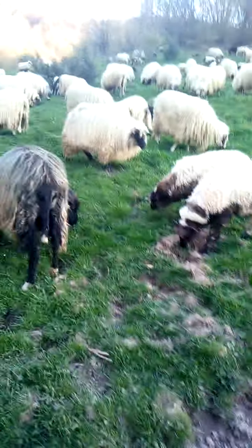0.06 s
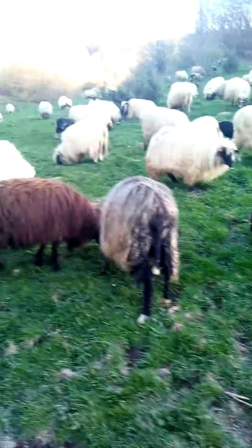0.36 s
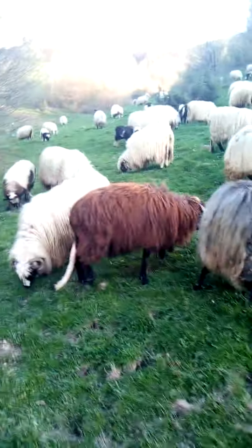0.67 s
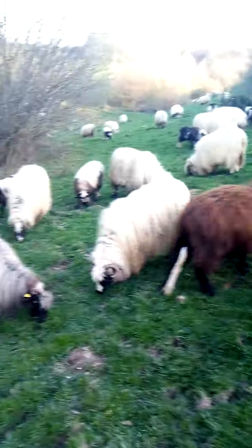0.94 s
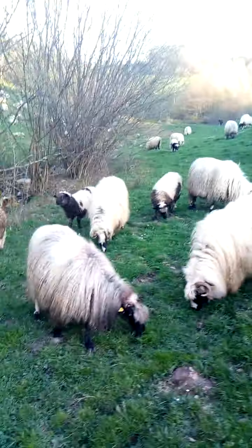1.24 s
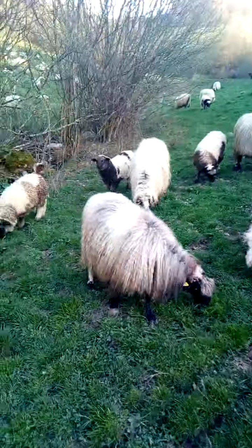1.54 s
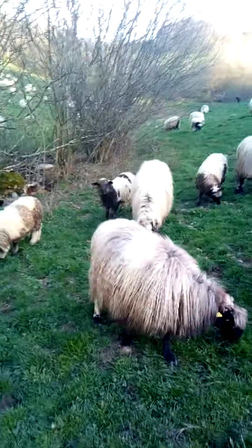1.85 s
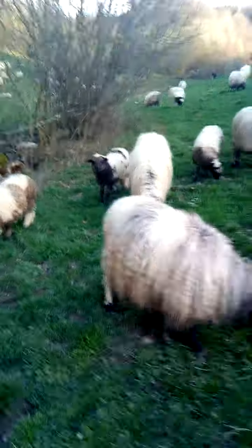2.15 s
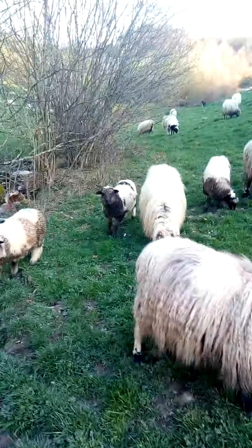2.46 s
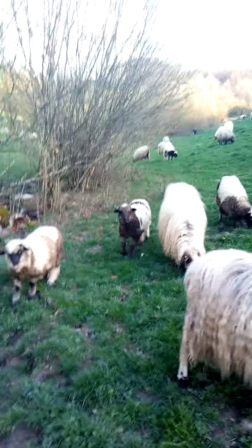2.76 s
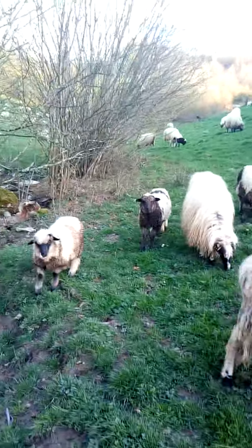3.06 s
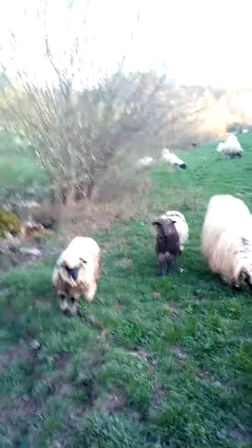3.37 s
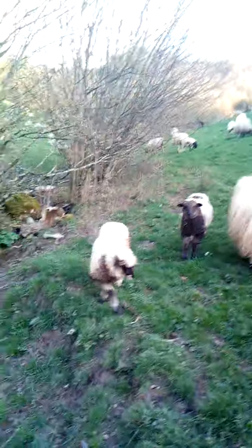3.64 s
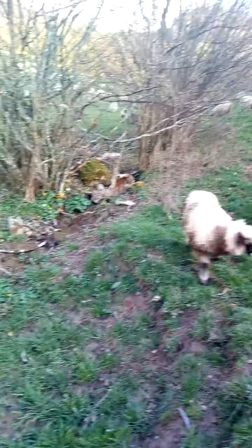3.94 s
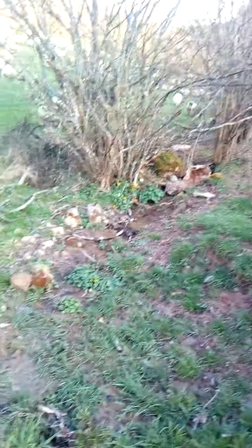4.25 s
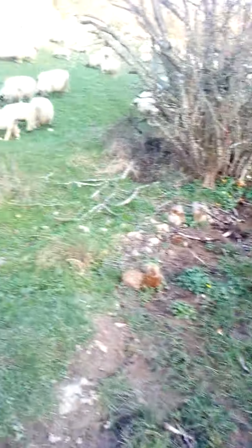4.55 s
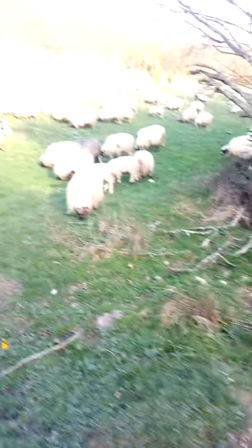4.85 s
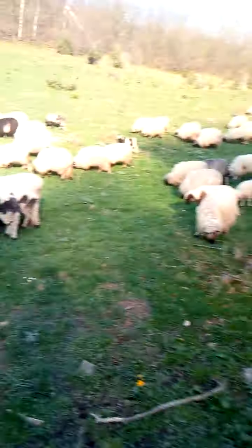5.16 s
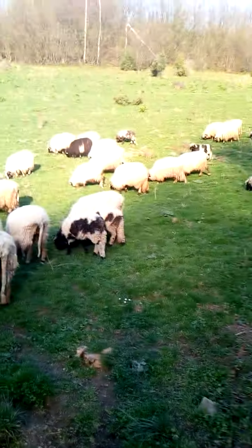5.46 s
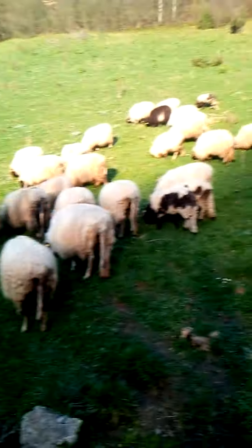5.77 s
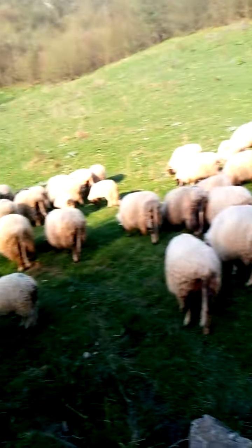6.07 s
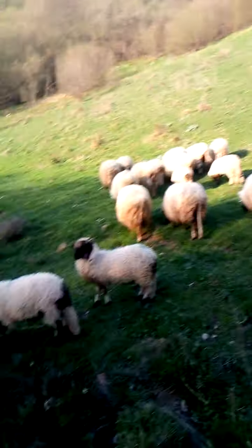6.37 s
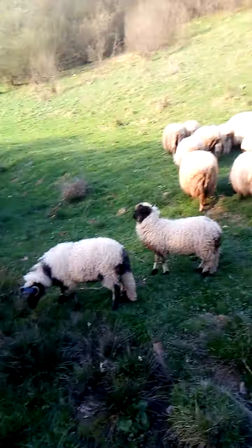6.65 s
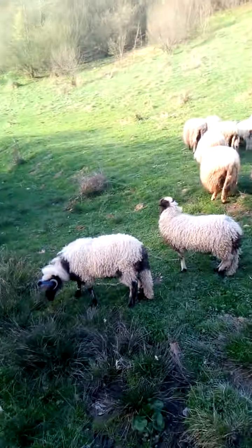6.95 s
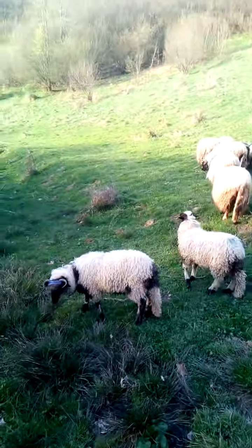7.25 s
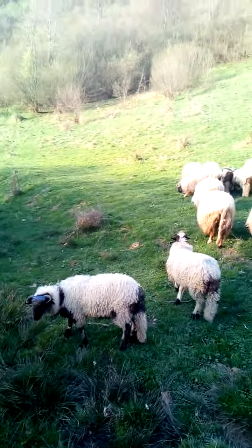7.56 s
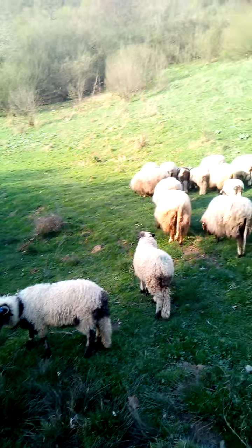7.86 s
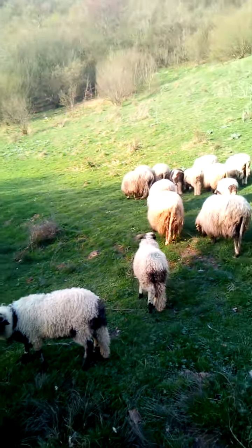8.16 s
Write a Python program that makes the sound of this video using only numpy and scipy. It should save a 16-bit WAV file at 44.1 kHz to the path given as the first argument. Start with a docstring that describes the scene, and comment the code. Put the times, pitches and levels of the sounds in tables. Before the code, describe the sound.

Hollow, uneven clanks of a sheep's bell, seven sharp smacking clicks close by, soft rustling and a far bleat near the end.

```python
"""Sheep bell on a hillside

Sheep graze in the open; one wears a sheet-metal bell that clanks as it tugs at the grass, each clapper
blow a hollow note under ringing wall modes. Someone among them turns in a jacket, cloth hissing on
cloth, and shifts on the turf with soft thuds and snapping stalks. Seven sharp smacks ring a small cavity
close by, like tongue clicks to coax a lamb. Near the end a sheep gives one quavering bleat far off."""
import sys
import numpy as np
from scipy import signal
from scipy.fft import rfft, irfft
from scipy.io import wavfile
from scipy.ndimage import uniform_filter1d

SR = 44100
rng = np.random.default_rng(int(sys.argv[2]) if len(sys.argv) > 2 else 0)


def store_wav(level_fs):
    """Save 16-bit WAV to argv[1]."""
    pcm = np.round(np.clip(np.atleast_2d(level_fs), -1, 1) * 32767)
    wavfile.write(sys.argv[1], SR, pcm.T.astype(np.int16))


N = 370881


def bell(hollow_hz=671, sway_hz=4.9, flutter_db=2.06, split_hz=14, rasp_db=-24, clank_t60=0.47):
    """Each clapper blow wakes the cup's quickly damped hollow note and the thinner modes of its wall."""
    # clapper blows: (time [s], hollow note [dB], its t60 [s], low hum [dB], high clang [dB],
    # humming mode [Hz], pinging mode [Hz], ping over the clang [dB])
    blows = [(0.073, -31.5, .13, -52.5, -52, 2045, 6212, 1),
             (0.2708, -27.5, .17, -62.5, -49.5, 2115, 5221, 7.5),
             (0.584, -32, .16, -53.5, -52.5, 2045, 3445, 7.5),
             (0.825, -25.5, 0.16, -58, -50, 2115, 5221, 18), (0.943, -29.5, .11, -58, -57, 2562, 5221, 7),
             (1.276, -29, .22, -57.5, -61.5, 2497, 5458, 2),
             (1.408, -20, .15, -48.5, -48.5, 2045, 4301, 7.5), (1.607, -29, .14, -49, -60.5, 2045, 6212, 2),
             (2.013, -26, .26, -56, -48, 2115, 6212, 2), (2.191, -25, .12, -56.5, -60.5, 2497, 6212, 7),
             (2.385, -36, 0.17, -60, -63, 2497, 6212, 8), (2.627, -31.5, .2, -70, -71, 1534, 3967, 2),
             (2.791, -32.5, 0.21, -68, -63, 1534, 6529, 4.5), (2.995, -28, .13, -51, -49, 2045, 4301, 0.5),
             (3.973, -28.5, .22, -57, -49.5, 1534, 6212, 6),
             (4.147, -31.5, .13, -57.5, -55.5, 2045, 4301, 9.5),
             (5.372, -33, .13, -65, -55.5, 2045, 4301, -1),
             (5.525, -36.5, .21, -60.5, -45, 2115, 4301, 4.5),
             (6.075, -47.5, .2, -56, -59.5, 2045, 6529, 4), (6.336, -34, .16, -59, -57.5, 1291, 5221, 10),
             (6.555, -51, .15, -57.5, -61.5, 2045, 6212, 5.5), (6.876, -37, .19, -58.5, -58, 1291, 5221, 2),
             (7.118, -37, .17, -57.5, -55, 2562, 3445, 2.5), (7.46, -37.5, .25, -50, -51, 1534, 3445, 0.5),
             (7.717, -36.5, 0.17, -54, -54.5, 1291, 3445, 6.5),
             (7.857, -32.5, .15, -54, -54, 1291, 3967, -11), (7.943, -28, .16, -45, -50, 1291, 6212, 2),
             (8.032, -27.5, .14, -48, -43, 2562, 5749, 0.5),
             (8.317, -41.5, 0.21, -66, -63, 2497, 4021, 6.5)]
    # modes of the sheet-metal wall: (frequency [Hz], relative level [dB], t60 [s])
    wall_modes = [(1076, -22, 0.3), (1291, -7.5, 0.34), (1534, -12, 0.7), (2045, -8, 0.55),
                  (2115, -15, 0.6), (2497, -12, 0.65), (2562, -17, 0.6), (3143, -16, 0.21),
                  (3445, -5, 0.26), (3892, -15, 0.3), (3967, -8, 0.35), (4021, -10, 0.2), (4301, -2, 0.16),
                  (4742, -14, 0.24), (4968, -18, 0.26), (5221, 0, 0.14), (5458, -7, 0.19),
                  (5620, -14, 0.19), (5749, -7, 0.17), (6212, -1, 0.13), (6443, -9, 0.2), (6529, -8, 0.27),
                  (6992, -16, 0.16), (7353, -12, 0.12), (7590, -18, 0.11), (8118, -21, 0.11),
                  (8828, -24, 0.16), (9598, -32, 0.17), (10039, -23, 0.09), (10755, -31, 0.12)]
    out, t = np.zeros(N), np.arange(int(.7 * SR)) / SR
    hz, db, t60 = np.transpose(wall_modes)
    register = np.searchsorted([2800, 6900], hz)  # low, high, top
    # the seam splits each mode into a beating pair
    beats = 1 + 0.15 * np.exp(2j * np.pi * split_hz * rng.standard_normal((len(hz), 1)) * t)
    rings = amp(-60 * t / t60[:, None]) * np.exp(2j * np.pi * hz[:, None] * t) * beats
    attack_s = np.where(register == 0, 0.0043, 0.0011)  # the low modes swell in last
    rings *= 1 - np.exp(-t / attack_s[:, None])
    for s, note_db, note_t60, hum_db, clang_db, hum_hz, ping_hz, ping_db in blows:
        rise_s = 0.0023 * amp(-0.37 * (note_db + 28.5))  # a gentle blow builds up more slowly
        # the swinging mouth bends and shakes the hollow note; a narrow band of noise roughens it
        turns = np.cumsum(hollow_hz + sway_hz * drift(len(t), 50)) / SR
        cup = np.sin(2 * np.pi * turns) + amp(rasp_db) * noise_band(len(t), 533, 866)
        decay = amp(note_db - 60 * t / note_t60 + flutter_db * drift(len(t), 90))
        note = cup * decay * (1 - np.exp(-t / rise_s)) ** 2
        top_db = clang_db + 2 + 0.24 * (clang_db + 56)  # a harder blow is brighter
        # the clapper never lands on the same spot, and each spot favours one low and one high mode
        spot_db = np.array([3, 3, 5])[register] * rng.standard_normal(len(hz))
        mode_db = db + np.array([hum_db - 1, clang_db, top_db])[register] + spot_db
        mode_db[abs(hz - hum_hz).argmin()] = hum_db
        mode_db[abs(hz - ping_hz).argmin()] = clang_db + ping_db
        phases = np.exp(2j * np.pi * rng.random(len(hz)))
        wall = (amp(mode_db) * phases @ rings).real
        clank = noise_band(len(t), 2810, 6800, order=6) * amp(clang_db - 8 - 60 * t / clank_t60)
        add(out, s, note + wall + clank)
    return out


def smacks(wet_share=0.15, wet_decay_s=0.0013, fizz_db=-25, fizz_s=0.0044):
    """A seal fizzes briefly, then lets go in two snaps that each ring a small cavity for an instant."""
    # double snaps: (time [s], first peak [dB], lower cavity [Hz], upper cavity [Hz], sharpness [dB],
    # gap to the second snap [s], second peak over the first [dB])
    releases = [(1.9864, -12, 2120, 3720, -17, .0041, 4.5), (2.236, -11, 2110, 4140, -15.5, .002, -2.5),
                (2.4914, -9.5, 3170, 3950, -5, 0.0057, -8.5), (2.7582, -19, 2030, 3220, -18.5, .0022, 3),
                (3.0102, -19.5, 2740, 4300, -7.5, .0023, 2.5), (3.2737, -16, 3020, 4280, -19, 0.0032, 0.5),
                (3.537, -8, 2600, 4550, -7, 0.0059, -3)]
    out, t = np.zeros(N), np.arange(1024) / SR
    for start, first_db, low_hz, high_hz, sharp_db, gap_s, second_db in releases:
        cavity = [(low_hz, 750, 1), (high_hz, 1100, -amp(1)), (6670, 1700, amp(sharp_db - 1))]
        for s, peak_db in [(start, first_db), (start + gap_s, first_db + second_db)]:
            push = (t == 0) + wet_share * rng.standard_normal(len(t)) * np.exp(-t / wet_decay_s)
            ring = sum(gain * formant(push, hz, width_hz) for hz, width_hz, gain in cavity)
            body = amp(sharp_db + 1) * band(push, 930, 3420)
            snap = band(ring + body, 250, 7100, order=5)
            add(out, s, amp(peak_db) * snap / abs(snap).max())
            fizz = noise_band(len(t), 2000, 6200, order=3)[:round(fizz_s * SR)]
            fizz *= np.linspace(0, 1, len(fizz))
            add(out, s - len(fizz) / SR, amp(peak_db + fizz_db) * fizz)
    return out


def turf(thud_width_hz=292, weight_lag_s=0.0219, weight_db=-15.5):
    """Hooves and feet thud in soft ground and crush grass, then the weight settles."""
    # steps: (time [s], thud level [dB], length [s], thud's low edge [Hz], crunch over the thud [dB])
    steps = [(1.029, -65, .1, 130, -18), (1.172, -71, 0.35, 101, 5), (1.394, -64, 0.18, 100, 5.5),
             (1.685, -42.5, 0.033, 330, -9), (1.71, -57.5, 0.063, 160, 1.5), (1.854, -65, 0.12, 180, 2),
             (2.032, -54.5, 0.13, 90, -2), (2.093, -57.5, .2, 102, 0), (2.755, -49, .028, 90, 6),
             (2.768, -57, .06, 55, 1), (2.999, -64.5, 0.069, 121, 10.5), (3.536, -53.5, 0.022, 170, -5),
             (4.172, -67, 0.088, 240, 3), (4.335, -63, 0.064, 160, 3), (4.944, -59, 0.063, 129, 5),
             (4.996, -74, 0.2, 220, 16), (5.112, -76, 0.1, 180, 16.5), (5.477, -64.5, 0.12, 152, 2),
             (6.279, -64.5, .11, 110, 6.5), (6.855, -71, 0.084, 191, 13.5)]
    out, size = np.zeros(N), SR // 2
    for s, db, length, low_hz, crunch_db in steps:
        soil = grainy(size, depth_db=3, rate_hz=116.2)
        thud = unit_rms(band(soil, low_hz, low_hz + thud_width_hz, order=3))
        grass = grainy(size, depth_db=5, rate_hz=301.6)
        crunch = unit_rms(band(grass, 375, 2260, order=3))
        weight = noise_band(size, 55, 170, order=3)
        envelope = swell(length, size)
        add(out, s, amp(db) * envelope * (thud + amp(crunch_db) * crunch))
        add(out, s + weight_lag_s, amp(db + weight_db) * envelope * weight)
    return out


def stalks(ticks_per_s=0.7, tick_db=-64, tick_s=0.0055, tick_hz=(2500, 7500)):
    """Single stalks snap or swish, with fainter ticks scattered among them."""
    # snaps and swishes: (time [s], level [dB], length [s], centre [Hz])
    snaps = [(0.76, -46.5, 0.0034, 2730), (1.818, -57, 0.1, 5300), (1.853, -41.5, 0.0017, 4400),
             (2.094, -42.5, 0.0071, 1430), (2.14, -38.5, 0.0043, 1410), (4.694, -57.5, .003, 2500),
             (4.86, -50.5, 0.024, 4930), (5.011, -45, 0.083, 4900), (5.138, -36.5, .003, 2300),
             (5.283, -52, 0.088, 4420), (6.385, -54, 0.014, 4220), (6.924, -48, 0.0021, 2920),
             (7.335, -57, .014, 4700), (7.493, -48, 0.0086, 4160)]
    out, size = np.zeros(N), SR // 2
    ticks = [(when * N / SR, tick_db, tick_s, np.interp(pitch, [0, 1], tick_hz))
             for when, pitch in rng.random((round(ticks_per_s * N / SR), 2))]
    for s, db, length, hz in snaps + ticks:
        spread = 1 + 0.5 * np.exp(-length / 0.004)  # the briefer the snap, the wider its band
        grains = grainy(size, depth_db=3, rate_hz=411)
        crackle = unit_rms(band(grains, 0.68 * hz / spread, 1.2 * hz * spread, order=3))
        add(out, s, amp(db) * swell(length, size) * crackle)
    return out


def jacket(trim_db=0.8, fold_db=3.0, brush_db=-14.5):
    """Cloth hisses as it slides on cloth, each fold with its own colour, over a dull brushing."""
    # swells of the sliding cloth: (time [s], level before the trim [dB])
    slide = [(0.0, -58.5), (0.18, -62.5), (0.37, -62), (0.47, -63), (0.71, -61), (0.79, -64), (1.2, -57.5),
             (1.39, -67.5), (1.75, -64), (1.95, -66.5), (2.16, -57.0), (2.36, -69.5), (2.68, -70),
             (2.8, -61), (2.93, -71), (3.1, -67.5), (3.7, -72.5), (3.9, -61), (4.23, -61), (4.28, -70.5),
             (4.68, -70.5), (5.18, -59.5), (5.76, -56.5), (6.01, -70), (6.19, -64.5), (6.42, -64),
             (6.62, -71.5), (7.24, -72.5), (7.34, -65.5), (7.83, -69.5), (8.08, -60), (8.24, -74),
             (8.38, -61)]
    # colour of the cloth's hiss: (frequency [Hz], relative level [dB])
    cloth_colour = [(500, -20), (1200, -9), (1600, -5), (2050, -9), (2600, -16), (3300, -8), (3850, 0),
                    (4700, -3), (5500, 0.5), (6000, -5), (6600, -9.5), (8000, -32), (10000, -33),
                    (16000, -50)]
    spectra = signal.stft(grainy(N, depth_db=1, rate_hz=150), nperseg=512)[2]
    # folds lift and dip random patches of frequency and time
    folds = uniform_filter1d(rng.standard_normal(spectra.shape), size=6, axis=0)
    folds = unit_rms(uniform_filter1d(folds, size=14, axis=1))
    friction = signal.istft(spectra * amp(fold_db * folds))[1][:N]
    hiss = coloured(friction, cloth_colour)
    brush = unit_rms(band(grainy(N, depth_db=0.5, rate_hz=40), 147, 840))
    slide_db = np.interp(np.arange(N) / SR, *np.transpose(slide))
    return amp(trim_db + slide_db) * (hiss + amp(brush_db) * brush)


def bleat(start_s=7.24, length_s=0.58, pitch_hz=273, level_db=-54.5, quaver_hz=10.5, jitter=0.0058):
    """Quavering pulses and breath pass through a far sheep's throat in one arch of pitch."""
    # throat formants: (frequency [Hz], width before broadening [Hz], relative level [dB])
    throat = [(1080, 170, 0), (1480, 330, -13), (2150, 200, -7), (3680, 380, -14)]
    out, t = np.zeros(N), np.arange(0, length_s, 1 / SR)
    quaver = np.cos(2 * np.pi * quaver_hz * (t - 0.027))
    arch = 1 - 0.11 * (2 * t / length_s - 1) ** 2
    pitch = pitch_hz * (arch + 0.016 * quaver)
    turns = np.cumsum(pitch * (1 + jitter * drift(len(t), 125.2))) / SR
    pulses = unit_rms(sum(np.cos(2 * np.pi * k * turns) for k in range(3, 18)))
    breath = 0.5 * rng.standard_normal(len(t)) * (1 + np.cos(2 * np.pi * turns))
    voice = sum(amp(db) * formant(pulses + breath, hz, 1.5 * width_hz) for hz, width_hz, db in throat)
    voice = unit_rms(band(voice, 960, 4300, order=5))  # grass and distance take the lows and the top
    envelope = np.minimum(t / 0.055, 1) * np.minimum((length_s - t) / 0.15, 1)
    shake_db = 15 * np.exp(-t / 0.08) * (quaver - 1) / 2  # the level quavers most at the start
    flutter_db = 0.6 * drift(len(t), 32.5)
    add(out, start_s, voice * envelope * amp(level_db + shake_db + flutter_db))
    return out


def hillside(x, t60):
    """The slope and the bushes scatter a sound into a tail of sparse echoes."""
    t = np.arange(SR) / SR
    echoes = rng.standard_normal(SR) * (rng.random(SR) < 2000 / SR)  # about 2000 a second
    echoes *= amp(-60 * t / t60) * (t > .008)
    return signal.fftconvolve(x, echoes / np.linalg.norm(echoes))[:N]


def air(level_db=-64.5):
    """A steady bed of still air and microphone hiss."""
    # colour of the bed: (frequency [Hz], relative level [dB])
    air_colour = [(20, -15), (60, -4), (130, -2), (300, 0), (700, -2), (1500, -2.5), (2800, -5.5),
                  (5000, -10), (7000, -10), (9000, -20.5), (13500, -22.5), (14300, -14), (15300, -11),
                  (16000, -1)]
    return amp(level_db) * coloured(rng.standard_normal(N), air_colour)


def amp(db):
    """Decibels to gain."""
    return 10 ** (np.asarray(db) / 20)


def unit_rms(x):
    """Scales to rms 1."""
    return x / np.sqrt(np.mean(x ** 2) + 1e-20)


def add(mix, s, sound):
    """Mixes a sound in at s seconds."""
    part = mix[max(round(s * SR), 0):][:len(sound)]
    part += sound[:len(part)]


def band(x, lo_hz, hi_hz, order=2):
    """Causal band-pass."""
    sos = signal.butter(order, [lo_hz, min(hi_hz, .48 * SR)], "band", fs=SR, output="sos")
    return signal.sosfilt(sos, x)


def noise_band(size, lo_hz, hi_hz, order=2):
    """Band-passed noise at rms 1."""
    return unit_rms(band(rng.standard_normal(size), lo_hz, hi_hz, order))


def formant(x, hz, width_hz):
    """Two like resonators in series, each width_hz wide, with peak gain 1."""
    b, a = signal.iirpeak(hz, hz / width_hz, fs=SR)
    return signal.lfilter(b, a, signal.lfilter(b, a, x))


def coloured(x, points):
    """Equalises x along (frequency [Hz], level [dB]) points, then scales to rms 1."""
    hz, db = np.transpose(points)
    bins_hz = np.fft.rfftfreq(len(x), 1 / SR)
    curve_db = np.interp(np.log(bins_hz + 1), np.log(hz + 1), db)
    return unit_rms(irfft(rfft(x) * amp(curve_db), len(x)))


def drift(size, hz):
    """A random wander of rms about 1 that takes a new course hz times a second."""
    knots = rng.standard_normal(int(size / SR * 1000) + 3)
    return np.interp(np.arange(size) / SR * hz, np.arange(len(knots)), knots) / np.sqrt(2 / 3)


def grainy(size, depth_db, rate_hz):
    """Noise that comes in little clumps, at rms 1."""
    return unit_rms(rng.standard_normal(size) * amp(depth_db * np.clip(drift(size, rate_hz), -2.2, 2.2)))


def swell(length_s, size):
    """Envelope of a brief contact: quick rise, slower fall, peak 1."""
    u = np.arange(size) / SR / (length_s / 4)
    return u * np.exp(1 - u)


def scene(bell_wet_db=-28, smack_wet_db=-27, bleat_wet_db=-13):
    """Bell, smacks and rustling close by, the bleat far off, all in quiet open air."""
    clanks, clicks, far_bleat = bell(), smacks(), bleat()
    long_tail = hillside(amp(bell_wet_db) * clanks + amp(bleat_wet_db) * far_bleat, t60=0.93)
    short_tail = hillside(amp(smack_wet_db) * clicks, t60=0.12)
    ambience = long_tail + short_tail + air()
    return (clanks + clicks + turf() + stalks() + jacket() + far_bleat + ambience)[None]


def record(dry, cutoff_hz=15600):
    """A steep low-pass trims the very top."""
    low_pass = signal.firwin(511, cutoff_hz, window=("kaiser", 9), fs=SR)
    return signal.oaconvolve(dry, low_pass[None], "same")


dry = scene()
out = record(dry)
store_wav(out)
```